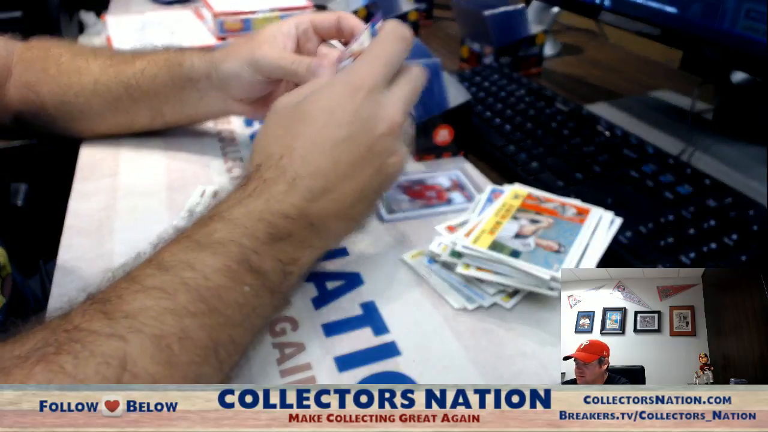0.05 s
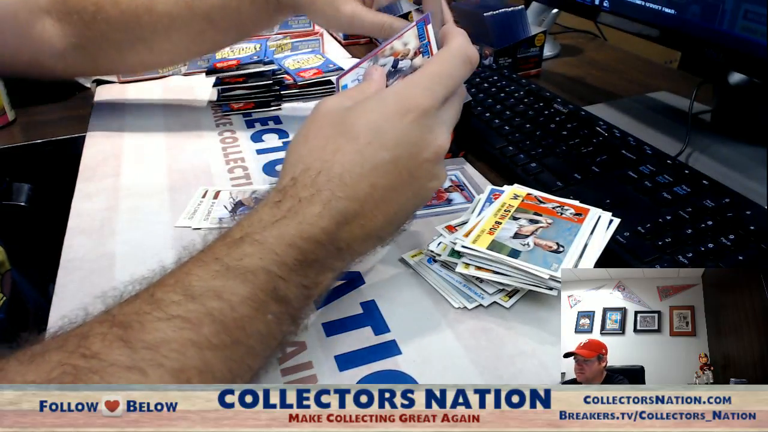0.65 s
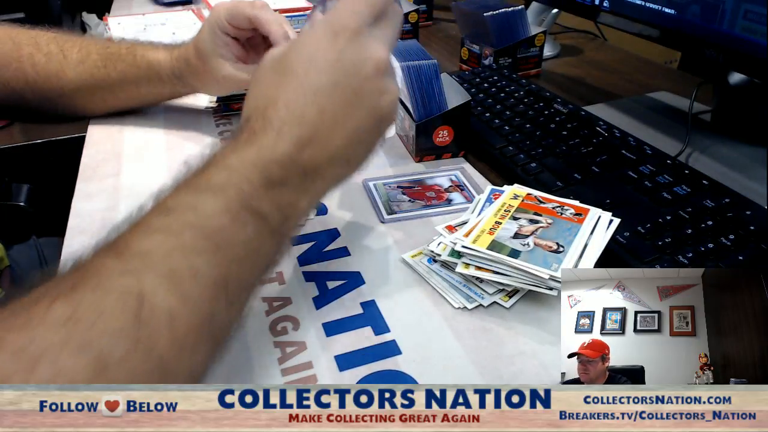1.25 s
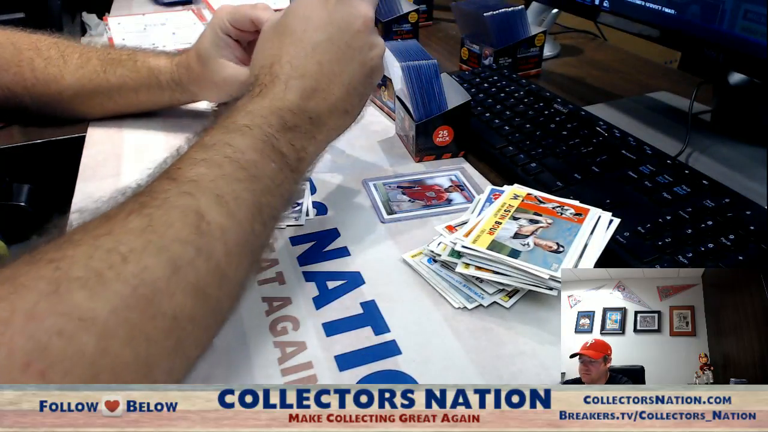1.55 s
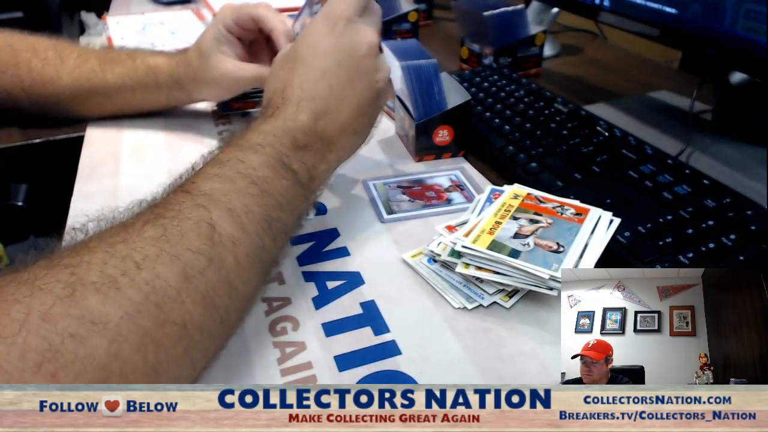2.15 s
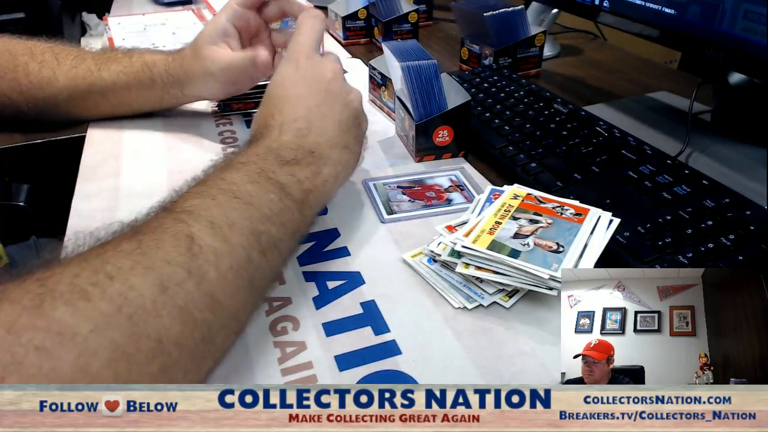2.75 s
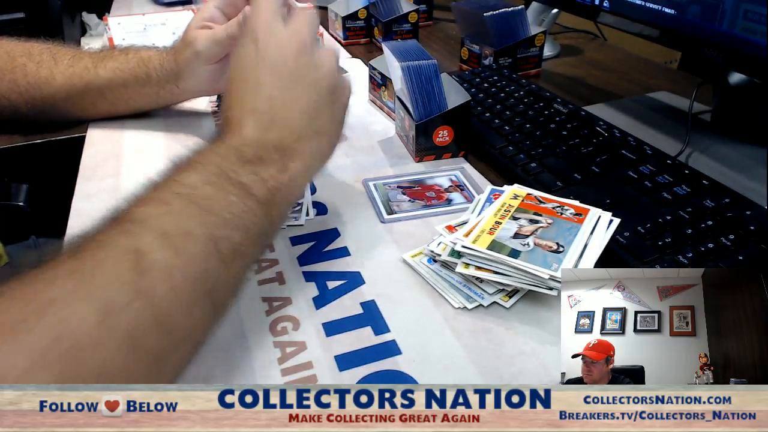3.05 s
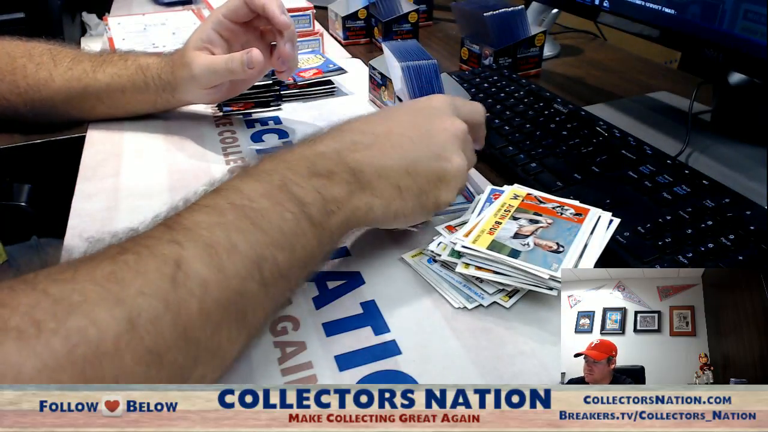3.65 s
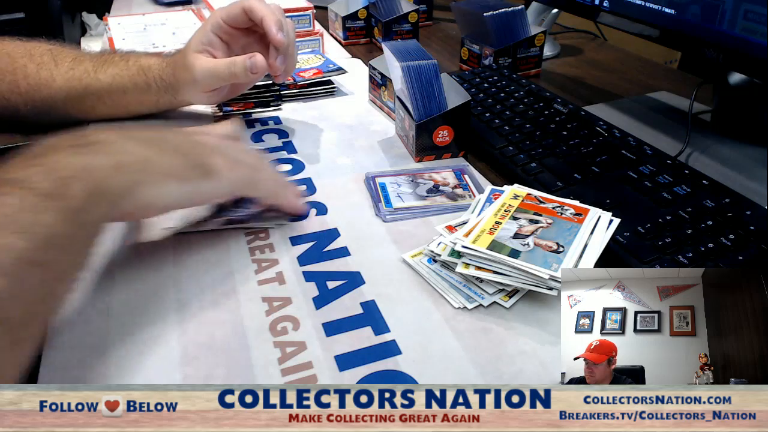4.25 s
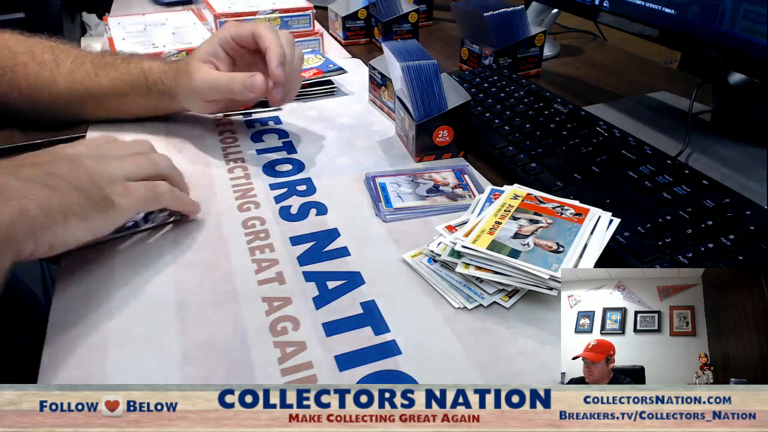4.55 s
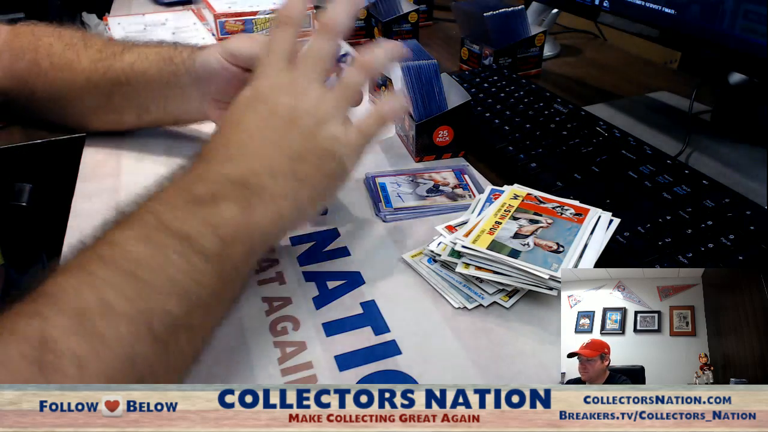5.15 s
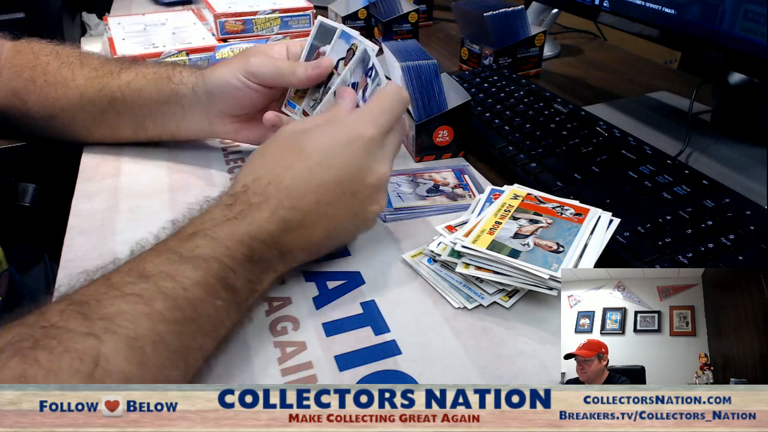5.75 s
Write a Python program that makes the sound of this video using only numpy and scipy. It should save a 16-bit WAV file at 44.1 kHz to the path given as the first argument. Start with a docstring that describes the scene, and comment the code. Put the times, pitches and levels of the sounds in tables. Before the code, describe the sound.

Trading cards swish and snap in the hands, with brief plastic creaks, dull desk knocks and one card holder slap over humming computer fans.

```python
"""Trading cards swish over each other and their edges snap, close to a two-port microphone in a small room.
The swish is countless tiny catches of card on card; once, a faint hollow tone rises through it.
Stiff plastic sticks and slips in short creaks, and a card holder slaps onto a pile.
Hands and cards knock the desk, which booms; computer fans hum underneath."""
import sys
import numpy as np
from scipy import signal
from scipy.fft import rfft, irfft
from scipy.io import wavfile
from scipy.ndimage import uniform_filter1d

SR = 44100
rng = np.random.default_rng(int(sys.argv[2]) if len(sys.argv) > 2 else 0)


def persist_wave(psi):
    """Save psi, clipped to +-1, as 16-bit WAV."""
    counts = np.round(np.clip(psi, -1, 1) * 32767).astype(np.int16)
    wavfile.write(sys.argv[1], SR, np.atleast_2d(counts).T)


N = 265482
TIME = np.arange(N) / SR
FILTER_HZ = np.fft.rfftfreq(2048, 1 / SR)


def amp(db):
    """Decibels to gain."""
    return 10 ** (np.asarray(db) / 20)


def unit(x):
    """Scales to rms 1."""
    return x / np.sqrt(np.mean(x ** 2) + 1e-20)


def curve(points, hz):
    """Interpolates a table along a log-frequency axis."""
    freq_hz, value = np.transpose(points)
    return np.interp(np.log(hz + 1), np.log(freq_hz + 1), value)


def add(mix, start_s, sound):
    """Mixes a sound in at start_s."""
    part = mix[..., round(start_s * SR):][..., :sound.shape[-1]]
    part += sound[..., :part.shape[-1]]


def response(db):
    """Causal impulse response of an EQ curve given at FILTER_HZ."""
    log_gain = np.log(amp(np.maximum(np.r_[db, db[-2:0:-1]], -100)))
    return np.fft.ifft(np.exp(np.conj(signal.hilbert(log_gain)))).real[:len(db)]


def wander(samples):
    """A random wobble of rms 1, smooth over that many samples."""
    rough = uniform_filter1d(rng.standard_normal(N), samples, mode="wrap")
    return unit(uniform_filter1d(rough, samples, mode="wrap"))


def scuff(rise_s, decay_s):
    """A contact that builds up and dies away as noise."""
    t = TIME[:2048]
    return rng.standard_normal(len(t)) * (1 - np.exp(-t / rise_s)) ** 2 * np.exp(-t / decay_s)


def at_level(x, db, length_s=0.005):
    """Gives a short sound the energy of length_s seconds at level db."""
    return amp(db) * x * np.sqrt(length_s * SR) / np.linalg.norm(x)


# Reverb time of the room: freq_hz, t60_s
ROOM_DECAY = [(150, 0.32), (600, 0.22), (1500, 0.25), (3500, 0.3), (7000, 0.25), (15000, 0.2)]
# Likeness of the echoes at the two ports, high for long waves: freq_hz, correlation
ECHO_LIKENESS = [(200, 0.74), (500, 0.92), (1000, 0.28), (2500, 0.3), (6000, 0)]
def room(x, wet_db, near_db, pan_db=2.5, samples=11264):
    """Direct sound from slightly right, quick echoes off desk and screen, and a tail; new on each call."""
    t = TIME[:samples]
    hz, frame_s, noise = signal.stft(rng.standard_normal((2, samples)), SR, nperseg=256)
    likeness = curve(ECHO_LIKENESS, hz)[:, None]
    noise[1] = likeness * noise[0] + np.sqrt(1 - likeness ** 2) * noise[1]
    decay = amp(-60 * frame_s / curve(ROOM_DECAY, hz)[:, None])
    tail = signal.istft(noise * decay, SR, nperseg=256)[1][:, :samples]
    tail *= np.clip(t / 0.0077, 0, 1) ** 2
    near = signal.istft(noise, SR, nperseg=256)[1][:, -samples:]
    near *= (t > 0.0006) * np.exp(-t / 0.0048)
    paths = sum(amp(db) * echo / np.linalg.norm(echo, axis=1, keepdims=True)
                for db, echo in [(wet_db, tail), (near_db, near)])
    paths[0, 2] += amp(-pan_db)  # the direct sound reaches the left port later and softer
    paths[1, 0] += amp(pan_db)
    return signal.fftconvolve(x[None], paths, axes=1)


# Tone of the room's rumble and hiss: freq_hz, gain_db
AIR_EQ = [(12, -29), (20, 10.5), (34, -7), (145, -9.5), (247, -19.5), (365, -34.5), (469, -28.5),
          (866, -36.5), (1390, -41), (1510, -42), (2570, -44.5), (2880, -46.5), (4500, -49.5), (7440, -60),
          (15800, -51.5)]
# Fan hum, as narrow bands of noise: pitch_hz, level_db, width_hz
FAN_HUM = [(55.52, -56, 10.2), (120.7, -68.5, 28), (231.1, -72, 8.9), (382.7, -79, 103),
           (1426, -90.5, 12.4)]
# Left-right likeness of the bed: freq_hz, correlation
AIR_LIKENESS = [(40, 0.19), (130, 0.39), (290, 0.74), (640, 0.34), (1400, 0.41), (3100, 0.22), (7000, 0.05),
                (15000, .1)]
# Pan of the bed: freq_hz, left_over_right_db
AIR_PAN = [(60, 5.5), (200, 1.5), (400, 1), (2400, 0), (15000, 1)]
def room_tone(air_db=-57):
    """A steady bed of rumble and hiss, with the wavering hum of computer fans."""
    hz = np.fft.rfftfreq(N, 1 / SR)
    wash = amp(curve(AIR_EQ, hz)) ** 2
    power = amp(air_db) ** 2 * wash / wash.mean()
    for pitch_hz, level_db, width_hz in FAN_HUM:
        band = 1 / (1 + (2 * (hz - pitch_hz) / width_hz) ** 2) ** 2
        power += amp(level_db) ** 2 * band / band.mean()
    left, independent = rfft(rng.standard_normal((2, N)))
    likeness, pan = curve(AIR_LIKENESS, hz), amp(curve(AIR_PAN, hz) / 2)
    right = likeness * left + np.sqrt(1 - likeness ** 2) * independent
    return irfft(np.array([left * pan, right / pan]) * np.sqrt(power), N)


def cushion(hz, cutoff_hz, damping=0.99):
    """A padded blow passes the lows, lifts them just below its cutoff and rolls off above."""
    ratio = hz / cutoff_hz
    return 1 / ((1 - ratio ** 2) ** 2 + (damping * ratio) ** 2)


# Resonances of the desk top: pitch_hz, gain_db, t60_s, left_over_right_db
DESK_MODES = [(32.5, 0.5, 0.79, 9.5), (54.3, -21.5, 0.23, 3), (80.2, -11.5, 0.5, 23.5),
              (104, -11.5, 0.14, 31), (125.85, -2, 0.38, -1), (143.75, -0.5, 0.262, 14),
              (223.6, -4.5, 0.12, 12.5), (277.6, -6, 0.096, -14), (351, -11.5, 0.13, -19.5),
              (398.7, -5, 0.14, 5), (495, 6, 0.031, -3), (530, -7.5, 0.16, 9), (568, -24.5, 0.31, -20),
              (690.5, 0, 0.11, 10), (827, -18, 0.22, 4), (927, -32.5, 0.26, -11), (1074, -22.5, 0.15, 24)]
# Tone of a blow's first instant: freq_hz, gain_db
THWACK_EQ = [(100, 12), (300, 13), (700, 16.5), (1200, 3.5), (2300, -1.5), (5000, -66), (12000, -82)]
# Blows on the desk: start_s, strength_db, cutoff_hz, sway_db (extra gain of modes under 100 Hz)
DESK_BLOWS = [(0.284, -49.5, 142, -15), (0.439, -37.5, 147, -9.5), (0.498, -52.5, 60, -5),
              (1.012, -48.5, 436, 7.5), (1.024, -46.5, 490, 5), (2.485, -45.5, 315, 8.5),
              (2.53, -44.5, 138, 8), (2.8494, -31, 1360, 4), (3.676, -41, 168, -7.5),
              (4.028, -40, 64.5, 2.5), (4.519, -55, 133, 4)]
def desk_knocks(swell_cycles=0.61, thwack_db=-4):
    """Blows ring the desk's modes; a soft one reaches only the low ones, which take longest to swell."""
    out, t = np.zeros((2, N)), TIME[:SR]
    hz, mode_db, t60_s, pan_db = np.transpose(DESK_MODES)[:, :, None]
    envelope = np.exp(-np.log(1000) * t / t60_s) * (1 - np.exp(-t * hz / swell_cycles))
    polarity = (-1) ** np.arange(len(DESK_MODES))[:, None]
    rings = polarity * envelope * np.sin(2 * np.pi * hz * t)
    pan = amp(np.hstack([pan_db, -pan_db]) / 2)
    for start_s, strength_db, cutoff_hz, sway_db in DESK_BLOWS:
        gains = amp(strength_db + mode_db + sway_db * (hz < 100)) * cushion(hz, cutoff_hz)
        add(out, start_s, (gains * pan).T @ rings)
        thwack = at_level(response(curve(THWACK_EQ, FILTER_HZ)), strength_db + thwack_db)
        padding = response(20 * np.log10(cushion(FILTER_HZ, cutoff_hz)))
        add(out, start_s, room(signal.fftconvolve(thwack, padding), wet_db=-3, near_db=3.5))
    return out


def hand_speed(start_s, push_s, attack_s=0.032, release_s=0.047):
    """Speed of a stroke, 0-1: it builds, then coasts to rest after push_s; long ones start gently."""
    t = TIME - start_s
    push = np.sin(np.pi / 2 * np.clip(t / (attack_s + 0.25 * push_s), 0, 1)) ** 2
    return push * np.exp(-np.clip(t - push_s, 0, 1) / release_s)


def rising_swish(start_s=4.05, push_s=0.27, level_db=-79, glide_hz=(523, 1174), width_hz=190):
    """A faint hollow tone rises through the swish as the cards move."""
    pitch_hz = np.interp(TIME, [start_s, start_s + push_s], glide_hz)
    phase = 2 * np.pi * np.cumsum(pitch_hz) / SR
    blur = [wander(round(SR / width_hz / 2)) for _ in range(2)]
    tone = unit(blur[0] * np.cos(phase) - blur[1] * np.sin(phase))
    return room(amp(level_db) * tone * hand_speed(start_s, push_s), wet_db=-8, near_db=-8)[:, :N]


# Resonances of a plastic sleeve: pitch_hz, width_hz, gain_db
SLEEVE_MODES = [(847, 130, -3), (1757, 64, -0.5), (2350, 59, -4.5), (3050, 240, -6.5), (3800, 130, -16),
                (6330, 130, -9), (7200, 44, -18)]
# Plastic slipping under the fingers:
# start_s, level_db, length_s, slips_per_s, focus_hz, falloff_db (per squared octave from the focus)
SLEEVE_CREAKS = [(0.498, -64, 0.0068, 590, 1000, 1), (0.51, -66.5, 0.007, 860, 4200, 10),
                 (0.541, -52.5, 0.0072, 360, 1550, 14), (0.561, -50.5, 0.006, 850, 1510, 0),
                 (0.57, -57.5, 0.01, 710, 3840, 0.5), (0.6125, -52, 0.0054, 880, 1700, 1.5),
                 (0.625, -59.5, 0.0065, 770, 3160, 16), (1.0253, -57.5, 0.0022, 900, 3230, 20)]
def sleeve_creaks(jitter=0.072, hiss=0.69, floor_db=-24):
    """Short runs of stick and slip ring a plastic sleeve; the grip decides which resonances speak."""
    out, hz = np.zeros((2, N)), FILTER_HZ
    peaks = sum(amp(db) ** 2 / (1 + (2 * (hz - pitch_hz) / width_hz) ** 2)
                for pitch_hz, width_hz, db in SLEEVE_MODES)
    floor_eq = [(200, 6), (1200, 16), (3500, 7.5), (8000, 9.5), (11000, -4), (16000, -10)]
    sleeve_db = 10 * np.log10(peaks + amp(floor_db + curve(floor_eq, hz)) ** 2)
    for start_s, level_db, length_s, slips_per_s, focus_hz, falloff_db in SLEEVE_CREAKS:
        grip_db = -np.minimum(falloff_db * np.log2((hz + 1) / focus_hz) ** 2, 14)
        wobble, grit = rng.standard_normal((2, 2048))[:, :int(length_s * SR)]
        slip_rate = slips_per_s * (1 + jitter * unit(uniform_filter1d(wobble, size=40)))
        slip_count = np.floor(np.cumsum(slip_rate) / SR)
        slips = unit(np.diff(slip_count, prepend=-1)) + hiss * grit
        creak = signal.fftconvolve(slips - slips.mean(), response(sleeve_db + grip_db))
        add(out, start_s, room(at_level(creak, level_db, length_s), wet_db=-6, near_db=-6))
    return out


# Tone of the card holder: freq_hz, gain_db
HOLDER_EQ = [(100, -11), (250, -8.5), (400, -5), (600, -9.5), (730, 1.5), (850, -7), (1020, 0),
             (1300, -7.5), (1900, -9.5), (3200, -9.5), (4500, -15), (6700, -16), (10000, -22.5),
             (15800, -29.5)]
# Its corners landing one after another: start_s, level_db, rise_s, decay_s, tilt_db_per_octave
HOLDER_HITS = [(3.6554, -50.5, .003, 0.0017, 2), (3.669, -42, 0.0032, 0.0014, 2.5),
               (3.6761, -33.5, 0.000082, 0.0031, -2.5), (3.681, -43, 0.0028, 0.0037, 5),
               (3.687, -55, 0.00018, .0007, -3)]
def holder_slap():
    """A rigid card holder clatters flat onto the pile."""
    out = np.zeros((2, N))
    for start_s, level_db, rise_s, decay_s, tilt in HOLDER_HITS:
        ring = response(curve(HOLDER_EQ, FILTER_HZ) + tilt * np.log2(FILTER_HZ / 1000 + 0.14))
        hit = signal.fftconvolve(scuff(rise_s, decay_s), ring)
        add(out, start_s, room(at_level(hit, level_db), wet_db=-1.5, near_db=-0.5))
    return out


# Tone of a card edge: freq_hz, gain_db
EDGE_EQ = [(120, -3), (350, 9), (700, 4), (1500, -6), (3000, -4), (5000, -6), (7500, -5.5), (10000, -5.5),
           (15500, -1.5)]
# Edges letting go, plus the sharp crack of the hard knock on the desk at 2.849 s: start_s, strength_db,
# body_db, top_db, contact_s
EDGE_SNAPS = [(0.143, -50.5, -9.5, 3.5, 0.0016), (0.156, -51.5, -12.5, -4, 0.0026),
              (0.308, -55.5, -18, -3.5, 0.00083), (0.441, -58.5, -3.5, -45, 0.004),
              (0.482, -59, -0.5, -35, 0.0029), (0.7715, -64, -5.5, -20, 0.002),
              (1.013, -58.5, 0.5, -38, 0.0014), (1.0236, -58.5, 2, -29, 0.0025),
              (1.4465, -61.5, -26, -13, 0.00059), (1.659, -55, -9, -10, 0.0016),
              (2.049, -63.5, -26, -9, 0.0006), (2.14, -56, -20, -6, 0.0026), (2.1445, -49, -7, -11, 0.0026),
              (2.153, -45, -14, -7.5, 0.0015), (2.383, -57, -14, -7, 0.0016),
              (2.4075, -53, -12, -7, 0.0035), (2.486, -59, -2.5, -32, 0.0018),
              (2.66, -52.5, -12, -15, 0.0005), (2.849, -38.5, 7, -27, 0.00092),
              (3.507, -54.5, -3.5, -13, 0.002), (3.52, -61, -3, -23, 0.0029),
              (5.329, -57.5, -1.5, -5, 0.0083), (5.623, -52.5, -2.5, -33, 0.0035),
              (5.7734, -49, -16, -17, 0.0021), (6.004, -39, -17.5, -14.5, 0.00099)]
def edge_snaps(trim_db=-2):
    """An edge slips off a finger or the stack and hits the next card; short contacts tick cleanest. The loudest
    click, at 2.849 s, is the crack of the hard knock on the desk."""
    out = np.zeros((2, N))
    ring = response(curve(EDGE_EQ, FILTER_HZ))
    for start_s, strength_db, body_db, top_db, contact_s in EDGE_SNAPS:
        contact = scuff(contact_s / 4, contact_s)
        contact *= contact_s / 0.002 / np.linalg.norm(contact)  # a 2 ms scuff is as strong as the tick
        contact[0] = 1  # the tick
        click = at_level(signal.fftconvolve(contact, ring), strength_db + trim_db)
        eq = [(1200, body_db + 6.5), (2800, 0), (7500, 0.017), (11000, top_db + 7), (16000, top_db - 0.5)]
        snap = signal.fftconvolve(click, response(curve(eq, FILTER_HZ)))
        add(out, start_s, room(snap, wet_db=-1, near_db=-10))
    return out


# Tone of card rubbing on card: freq_hz, gain_db
FRICTION_EQ = [(200, -12.5), (500, -9.5), (1000, -7), (1600, -9), (3000, -0.5), (4500, 1), (7200, 3),
               (10000, -3.5), (15500, -7.5)]
def friction(top_db, scrape_db, grain_db=3.5, grains_per_s=2500):
    """Tiny catches of card on card; top_db sets a fast stroke's treble, scrape_db a pressed one's lows."""
    catches = rng.standard_normal(N) * amp(grain_db * np.minimum(rng.exponential(1, N), 4))
    catches *= rng.random(N) < grains_per_s / SR
    grit = unit(catches) + rng.standard_normal(N)
    rub = unit(signal.oaconvolve(grit, response(curve(FRICTION_EQ, FILTER_HZ)))[:N])
    top = signal.sosfiltfilt(signal.butter(2, 9000, "high", fs=SR, output="sos"), rub)
    scrape = signal.sosfiltfilt(signal.butter(2, 2000, fs=SR, output="sos"), rub)
    middle = rub - top - scrape
    return middle + unit(top) * amp(np.minimum(top_db, 2)) + unit(scrape) * amp(np.minimum(scrape_db, 3))


# Strokes over card or mat: start_s, push_s, strength_db, top_db, scrape_db (both relative to strength)
CARD_STROKES = [(-0.07, 0.29, -76.5, 5, -19), (0.235, 0.054, -66.5, -9.5, -14.5),
                (0.46, .17, -72.5, -10, 1), (0.91, 0.032, -82, -12, -3), (1.15, 0.071, -77, -8, -8.5),
                (1.298, 0.045, -71, -5, -16), (1.86, 0.063, -79.5, -6, -2), (2.06, .06, -83.5, 2, -1),
                (2.14, .05, -72, -6, -26), (2.385, 0.021, -62.5, 0, -21), (2.45, 0.025, -76, -18, 2),
                (2.589, 0.039, -70, -13, -6.5), (2.7, .11, -82, -14, -14), (2.95, 0.056, -76, -24, -13),
                (3.49, .045, -85, -10, -2), (3.61, .08, -79, -10, 6), (4.07, .3, -70, -1, -6),
                (4.4, 0.27, -83.5, -2, 4.5), (4.678, 0.048, -76.5, -12, 9), (4.74, 0.19, -75.5, -11, -13),
                (5.005, 0.19, -78.5, 7, -7), (5.19, 0.081, -69, -4.5, -14), (5.335, 0.056, -66.5, 0, -8.5),
                (5.53, 0.13, -72.5, 12, -12), (5.605, 0.098, -63, -5.5, -15.5),
                (5.69, 0.12, -73.5, -2, -4.5), (5.899, 0.024, -74, -1, -7), (5.978, 0.056, -61.5, -3, -1)]
def stroke_envelopes(rest_db=-88, rest_top_db=-4, rest_scrape_db=-8):
    """Strokes add to the rustle of cards shifting in the grip: level, relative top and scrape, in dB."""
    rustle_db = rest_db - 1.5 * wander(round(0.033 * SR))
    power = amp([[0], [rest_top_db], [rest_scrape_db]]) ** 2 * amp(rustle_db) ** 2
    for start_s, push_s, db, top_db, scrape_db in CARD_STROKES:
        power += amp([[db], [db + top_db], [db + scrape_db]]) ** 2 * hand_speed(start_s, push_s) ** 2
    whole, top, scrape = 10 * np.log10(power)
    return whole, top - whole, scrape - whole


def card_slides(direct_db=-5, wash_db=-0.5, flutter_db=0.1, echo_db=-4, echo_s=0.0022, drift_s=0.00015):
    """Card rubs on card; echoes off desk and screen drift as the hands move. Each port has its own wash."""
    level_db, top_db, scrape_db = stroke_envelopes()
    rub, wash_left, wash_right = (friction(top_db, scrape_db) for _ in range(3))
    echoes = sum(np.interp(TIME - k * echo_s - drift_s * wander(12000), TIME, rub) for k in (1, 2, 3))
    close = rub + amp(echo_db) * echoes
    direct = amp(direct_db) * np.array([np.roll(close, 1), close])
    wash = amp(wash_db) * np.array([wash_left, wash_right])
    return (direct + wash) * amp(level_db + flutter_db * wander(300))


def scene():
    """Card handling and desk knocks over the room tone, in stereo."""
    cards = card_slides() + rising_swish() + edge_snaps() + sleeve_creaks() + holder_slap()
    return cards + desk_knocks() + room_tone()


def record(dry):
    """A steep low-pass takes off the very top."""
    lowpass = signal.firwin(511, cutoff=15900, window=("kaiser", 9), fs=SR)
    return signal.oaconvolve(dry, lowpass[None], "same")


dry = scene()
out = record(dry)
persist_wave(out)
```